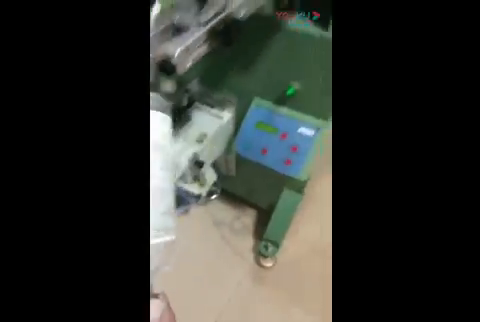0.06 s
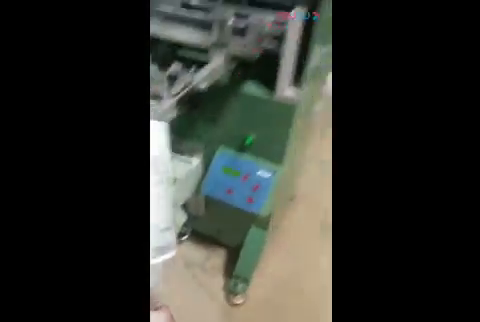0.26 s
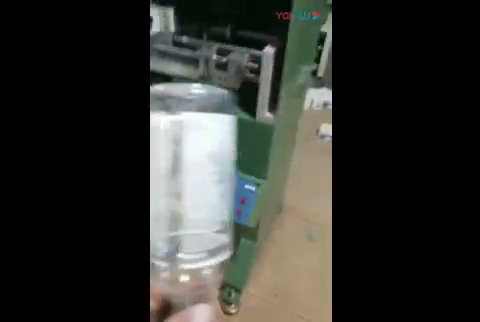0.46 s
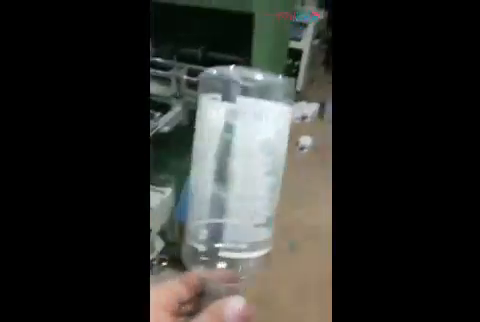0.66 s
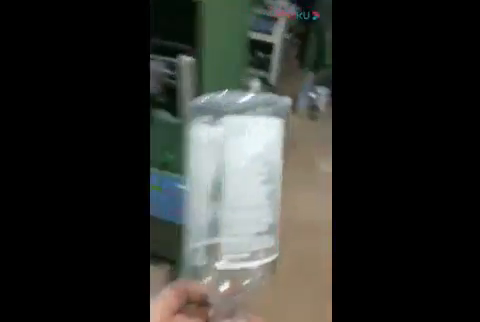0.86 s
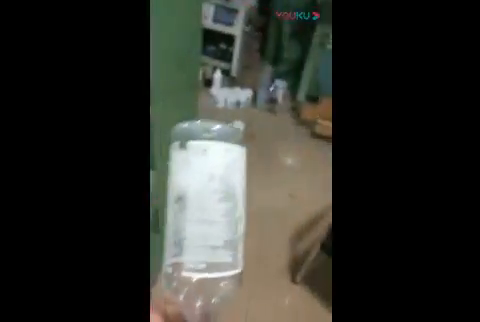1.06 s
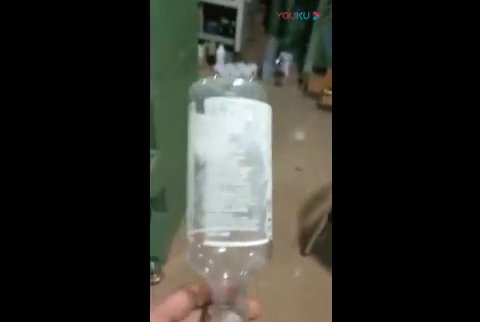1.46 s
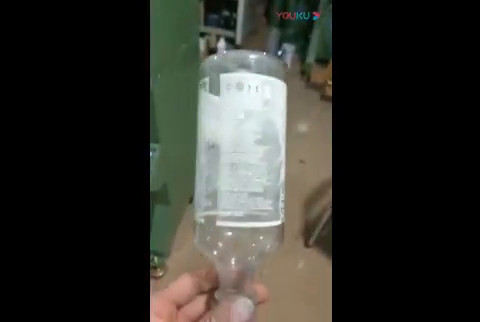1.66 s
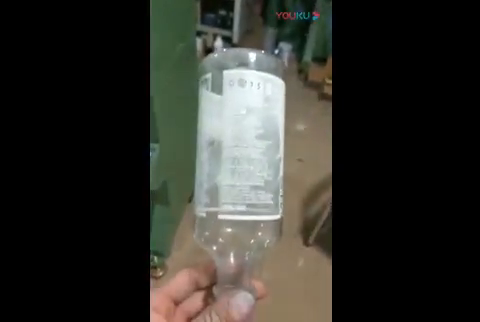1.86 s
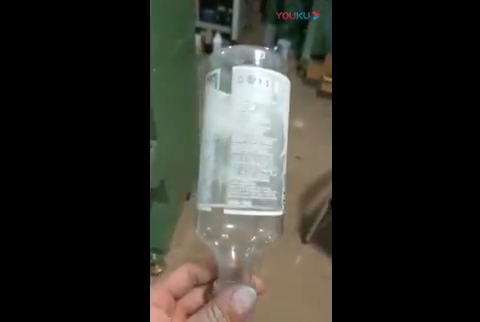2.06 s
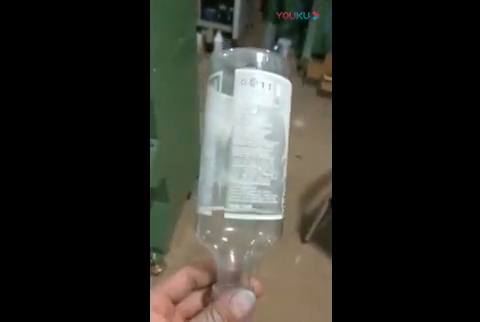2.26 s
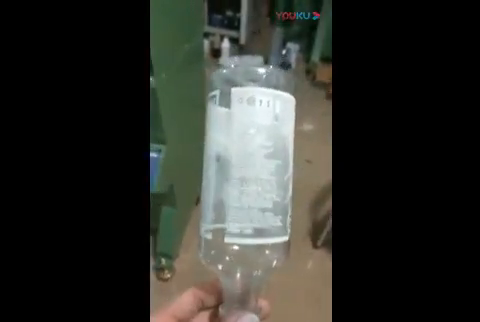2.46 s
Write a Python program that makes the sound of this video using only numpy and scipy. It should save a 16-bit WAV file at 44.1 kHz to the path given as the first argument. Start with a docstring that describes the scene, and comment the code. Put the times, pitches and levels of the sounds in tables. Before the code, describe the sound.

A whistling burst of compressed air from a machine, then a rattling thud over workshop hum.

```python
"""A burst of compressed air hisses and whistles from the exhaust port of a bottle printing machine.
The valve snaps, and five high tones take turns to dominate over the jet. Meanwhile a carriage
slides, ringing with friction, and lands with a rattling thud. Later it makes a shorter stroke,
then a faint one as a drive whines. A motor hums throughout the workshop and a little air leaks."""
import sys
import numpy as np
from scipy import signal
from scipy.fft import rfft, irfft
from scipy.io import wavfile
from scipy.ndimage import uniform_filter1d

SR = 44100
rng = np.random.default_rng(int(sys.argv[2]) if len(sys.argv) > 2 else 0)


def inscribe(sig):
    """Save sig as 16-bit PCM at rate SR to the path in sys.argv[1].

    A 1-D sig is mono; a 2-D sig holds one channel per row.
    Samples are clipped to [-1, 1] before scaling.
    """
    pcm = np.round(np.clip(np.atleast_2d(sig).T, -1, 1) * 32767)
    wavfile.write(sys.argv[1], SR, pcm.astype(np.int16))


N = 110250


def undb(db):
    """Decibels to gain."""
    return 10 ** (np.asarray(db) / 20)


def clock():
    """Sample times in seconds."""
    return np.arange(N) / SR


def unit(x):
    """Scale to rms 1."""
    return x / np.sqrt(np.mean(x ** 2))


def noise(spectrum):
    """Noise of rms 1, shaped by (Hz, dB) points."""
    hz, db = np.array(spectrum, float).T
    log_f = np.log(np.maximum(np.fft.rfftfreq(N, 1 / SR), 1))
    low_cut_db = 20 * np.maximum(np.log(hz[0]) - log_f, 0)
    gain = undb(np.interp(log_f, np.log(hz), db) - low_cut_db)
    return unit(irfft(rfft(rng.standard_normal(N)) * gain, N))


def ring(hz, width_hz):
    """A resonance driven by turbulence or friction."""
    f = np.maximum(np.fft.rfftfreq(N, 1 / SR), 1)
    detuning = .5 * hz / width_hz * (f / hz - hz / f)
    return unit(irfft(rfft(rng.standard_normal(N)) / (1 + 1j * detuning) ** 2, N))


def walk(per_s):
    """Smooth random wander of rms 1."""
    span = max(int(SR / per_s), 2)
    return unit(uniform_filter1d(uniform_filter1d(rng.standard_normal(N), span), span))


def curve(points):
    """Gain along (seconds, dB) points, fading beyond their ends."""
    times, db = np.array(points, float).T
    t = clock()
    beyond_s = np.maximum(times[0] - t, 0) + np.maximum(t - times[-1], 0)
    return undb(np.interp(t, times, db)) * np.exp(-20 * beyond_s)


def gate(start_s, end_s, attack_s, release_s):
    """Rise centred on the start, hold, exponential release."""
    t = clock()
    rise = np.clip((t - start_s) / attack_s + .5, 0, 1)
    return rise * np.exp(-np.maximum(t - end_s, 0) / release_s)


def tone(hz, waver_hz, per_s):
    """A sine of rms 1 whose pitch wavers."""
    return np.sqrt(2) * np.sin(2 * np.pi * np.cumsum(hz + waver_hz * walk(per_s)) / SR)


def room(x, tail_db=-9.5, t60_s=0.99):
    """Add a diffuse tail from the workshop walls."""
    t = clock()
    tail = rng.standard_normal(N) * np.exp(-np.log(1000) * t / t60_s) * np.minimum(t / 0.017, 1)
    return x + undb(tail_db) * signal.fftconvolve(x, tail / np.linalg.norm(tail))[:N]


# Machine noise and faint hiss. Each row: frequency in Hz, relative level in dB.
SHOP_SPECTRUM = [(25, -18.5), (48, -4), (80, -1.5), (140, -1.5), (170, -4.5), (215, -1), (370, -4.5),
                 (590, -9), (700, -13), (940, -13.5), (1070, -13), (1330, -17.5), (2200, -20),
                 (2700, -21.5), (3300, -27), (3700, -48.5)]
HISS_SPECTRUM = [(3000, 5.5), (3800, -19), (5000, 8), (6300, -5), (8000, -10.5), (8900, -14.5),
                 (9400, -26.5)]
# Motor lines. Each row: frequency in Hz, level in dB.
MOTOR_LINES = [(193.8, -66), (220.7, -55.5), (581.4, -56), (1163, -55), (1744, -71)]


def workshop():
    """Steady motor hum, machine noise and hiss; a slight air leak midway."""
    hum = sum(undb(db) * tone(hz, waver_hz=1.5, per_s=12.8) * undb(2.4 * walk(12))
              for hz, db in MOTOR_LINES)
    leak = ring(6150, width_hz=350) * undb(-58.5) * gate(1.23, 1.973, attack_s=.11, release_s=.11)
    machines = noise(SHOP_SPECTRUM) * undb(-41.5 + 0.74 * walk(21))
    hiss = noise(HISS_SPECTRUM) * undb(-65)
    return machines + hiss + hum + leak


# Each row: time in seconds, pitch in Hz, level in dB.
WHINE_PATH = [(2.121, 2590, -80), (2.231, 2622, -66), (2.38, 2690, -61), (2.479, 2700, -52)]


def drive_whine():
    """A drive speeds up quietly."""
    times, hz, db = np.array(WHINE_PATH, float).T
    whine = tone(np.interp(clock(), times, hz), waver_hz=28.4, per_s=200)
    return whine * curve(np.c_[times, db]) * undb(1.5 * walk(50))


# Each row: start in seconds, end in seconds, pitch in Hz, level in dB.
GUIDE_SQUEAKS = [(0.028, 0.17, 1875, -42), (0.44, .42, 2000, -42.5), (0.16, 0.4, 2170, -49),
                 (0.073, .1, 1135, -40.5), (0.19, .23, 985, -39), (1.794, 2.03, 1330, -53),
                 (2.34, 2.428, 1085, -47.5)]


def guide_squeaks():
    """The carriage guides squeak thinly."""
    out = 0
    for start_s, end_s, hz, db in GUIDE_SQUEAKS:
        squeak = tone(hz, waver_hz=15.14, per_s=90) * undb(db + 4.7 * walk(50))
        out += squeak * gate(start_s, end_s, attack_s=.032, release_s=.035)
    return out


# Each row: start in seconds, end in seconds, level in dB, main ring in Hz, upper ring in Hz,
# relative scrape level in dB.
CARRIAGE_STROKES = [(-.1, 0.152, -38.5, 618, 1105, 3.5), (.22, 0.558, -37, 548.6, 1070, -1.5),
                    (1.695, 1.935, -37, 594.6, 1080, -3.5), (2.32, 2.46, -58, 593, 1058, -7)]
# Each row: frequency in Hz, relative level in dB.
SCRAPE_SPECTRUM = [(200, -12), (400, -12.5), (520, 0), (700, -7.5), (850, -2.5), (1100, -15), (1350, -15),
                   (1700, -14), (2500, -22.5), (4000, -48.5)]


def carriage_slide(core_db=-1, upper_db=-6):
    """Sliding friction excites a broad scrape and two rings, each with a singing core."""
    out = 0
    for start_s, end_s, db, main_hz, upper_hz, scrape_db in CARRIAGE_STROKES:
        main = ring(main_hz, width_hz=70) + undb(core_db) * tone(main_hz, waver_hz=11.16, per_s=54)
        upper = ring(upper_hz, width_hz=55) + undb(core_db) * tone(upper_hz, waver_hz=12, per_s=60)
        stroke = main + undb(upper_db) * upper + undb(scrape_db) * noise(SCRAPE_SPECTRUM)
        out += stroke * undb(db) * gate(start_s, end_s, attack_s=.12, release_s=.11)
    return out


# Each row: start in seconds, level in dB.
LANDING_KNOCKS = [(0.693, -27), (0.711, -28.5), (0.733, -25), (0.752, -29), (0.761, -30.5), (.797, -25)]
# Each row: frequency in Hz, relative level in dB.
KNOCK_SPECTRUM = [(30, -38), (50, 2.5), (75, -2.5), (110, 1.5), (160, -6.5), (220, 3.5), (330, -7),
                  (480, -4), (700, -10.5), (1000, -10), (1400, -21.5), (2500, -24), (5000, -38)]
# Each row: time in seconds, level in dB.
FRAME_LEVELS = [(.5, -37), (.6, -38.5), (.7, -40.5), (.77, -34), (.88, -29), (.96, -49), (1.07, -36.5),
                (1.15, -48.5), (1.3, -72)]


def carriage_landing(boom_hz=148, boom_db=-7.5, frame_hz=550.6):
    """The carriage lands: dull knocks, their low boom in the room, and the ringing frame."""
    def envelope(attack_s, decay_s):
        powers = [(undb(db) * gate(s, s, attack_s, decay_s)) ** 2 for s, db in LANDING_KNOCKS]
        return np.sqrt(sum(powers))

    knocks = noise(KNOCK_SPECTRUM) * envelope(attack_s=.002, decay_s=.058)
    lowpass = signal.butter(2, boom_hz, fs=SR, output="sos")
    boom = signal.sosfilt(lowpass, noise(KNOCK_SPECTRUM)) * envelope(attack_s=.01, decay_s=.27)
    thud = room(knocks) + undb(boom_db) * boom
    frame = tone(frame_hz, waver_hz=3.76, per_s=40) * curve(FRAME_LEVELS)
    return thud + frame


# Each row: start in seconds, end in seconds, level in dB, attack in seconds, release in seconds.
AIR_RUSHES = [(.055, .16, -60.5, .015, 0.054), (.51, 0.595, -55, 0.075, 0.12),
              (0.752, 0.841, -37.5, .05, 0.054), (.9, 1.052, -61, .05, 0.11), (1.255, 1.95, -61, 0.13, .08),
              (2.332, 2.505, -61, 0.038, 0.046)]
# Each row: frequency in Hz, relative level in dB.
RUSH_SPECTRUM = [(2000, -27), (3000, -10), (3800, -5.5), (5000, 0.5), (6200, 2), (8000, 0.5), (9000, -4),
                 (9600, -24.5)]
ROAR_SPECTRUM = [(120, -2), (250, 0.5), (500, -1.5), (1300, 4), (2200, 1.5), (3000, 2), (3600, -7),
                 (4300, -10), (5200, 0), (6000, -26)]


def air_rush():
    """Broad rushes as the port empties and leaks, with one lower roar of moving air."""
    envelope = sum(undb(db) * gate(start_s, end_s, attack_s, release_s)
                   for start_s, end_s, db, attack_s, release_s in AIR_RUSHES)
    rush = noise(RUSH_SPECTRUM) * envelope
    roar = noise(ROAR_SPECTRUM) * undb(-34.5) * gate(.26, .31, attack_s=.17, release_s=.22)
    return room(rush + roar)


# Each row: start in seconds, level in dB, decay in seconds.
VALVE_SNAPS = [(0.045, -47, 0.019), (0.202, -23.5, 0.0046), (.29, -22.5, 0.011)]
# Each row: time in seconds, level in dB.
FLOW_LEVELS = [(0.02, -91), (0.045, -55), (0.185, -51), (0.203, -22.5), (0.24, -27), (0.31, -48),
               (0.37, -67), (0.48, -55), (0.515, -22), (0.6, -23.5), (0.64, -27.5), (0.74, -33.5),
               (0.83, -38), (0.95, -59.5), (1.15, -63.5), (1.4, -77)]
# Each row: frequency in Hz, relative level in dB.
JET_SPECTRUM = [(1500, -21), (3000, -22), (3600, -20), (4500, -23.5), (5500, -14.5), (6050, -13),
                (6250, -4.5), (6400, 10.5), (6540, 6), (6670, -3.5), (6790, 1.5), (6920, -6), (7230, 2),
                (7600, -9), (9000, -11), (9800, -18)]


def port_jet():
    """The jet hisses with the flow through the port and spikes as the valve snaps."""
    hiss = noise(JET_SPECTRUM)
    flow = curve(FLOW_LEVELS) * undb(1.5 * walk(70))
    snaps = sum(undb(db) * gate(s, s, attack_s=.0015, release_s=decay_s)
                for s, db, decay_s in VALVE_SNAPS)
    return hiss * (flow + snaps)


# Pitch of each port tone.
PORT_TONES_HZ = [7157, 6477, 6289, 3881, 5712]
# One curve per tone. Each row: time in seconds, level in dB.
PORT_TONE_LEVELS = [
    [(0.17, -72), (0.186, -51), (0.206, -26), (0.232, -26.5), (0.272, -12.5), (0.344, -12), (0.4, -28),
     (0.474, -19.5), (0.504, -30.5), (0.548, -21.5), (0.694, -44), (0.75, -52)],
    [(0.02, -107), (0.042, -50), (0.126, -45), (0.174, -65), (0.202, -51), (0.218, -20.5), (0.244, -16),
     (0.364, -25.5), (0.4, -9.5), (0.42, -11), (0.474, -26), (0.516, -14.5), (0.554, -35.5), (0.57, -21),
     (0.8, -50)],
    [(.28, -49), (.32, -31), (.47, -44), (.5, -30), (.515, -38), (.56, -27.5), (.6, -28), (.635, -37),
     (.72, -31), (.76, -47), (.83, -38.5), (.92, -48.5), (1.0, -73)],
    [(.03, -93), (.055, -36), (.09, -56.5), (.115, -41.5), (.19, -58), (.21, -36), (.23, -32),
     (.268, -49.5), (.292, -29), (.32, -44.5), (.41, -36.5), (.435, -47), (.535, -41.5), (.7, -56.5),
     (.85, -54)],
    [(.2, -60), (.25, -45), (.3, -41), (.42, -50), (.47, -57), (.52, -44.5), (.6, -42), (.65, -62)],
]


def port_whistle(flutter=.12, skirt_db=-19):
    """The port's tones flutter in the jet; turbulence widens each by a rough skirt."""
    out = 0
    for hz, levels in zip(PORT_TONES_HZ, PORT_TONE_LEVELS):
        core = tone(hz, waver_hz=6, per_s=60) * (1 + flutter * walk(130))
        skirt = undb(skirt_db) * ring(hz, width_hz=200)
        out += (core + skirt) * curve(levels)
    return out


def scene():
    """Exhaust, carriage and background in mono."""
    exhaust = port_whistle() + port_jet() + air_rush()
    carriage = carriage_slide() + guide_squeaks() + carriage_landing()
    return (exhaust + carriage + drive_whine() + workshop())[None]


def record(dry):
    """Steep low-pass at 9800 Hz."""
    return signal.sosfilt(signal.ellip(10, .2, 80, 9800, fs=SR, output="sos"), dry)


dry = scene()
out = record(dry)
inscribe(out)
```